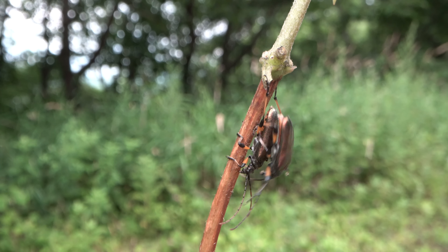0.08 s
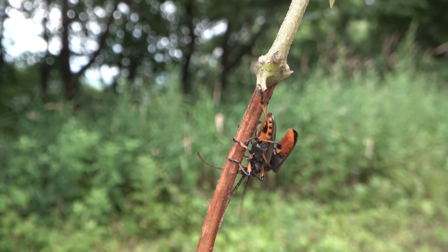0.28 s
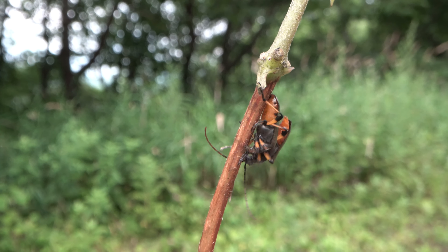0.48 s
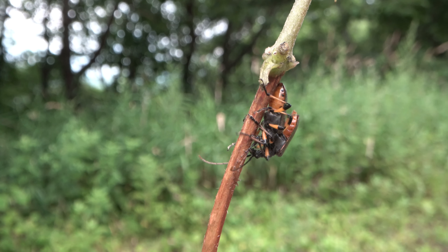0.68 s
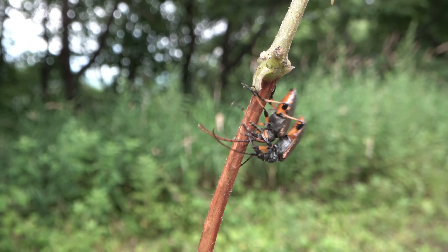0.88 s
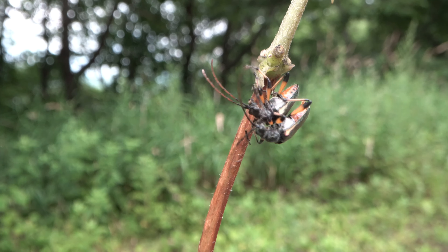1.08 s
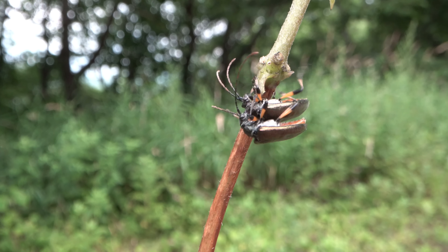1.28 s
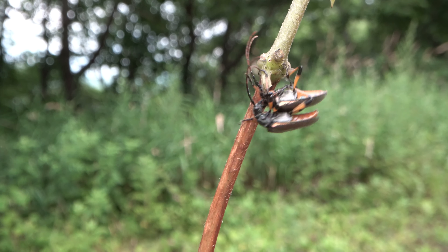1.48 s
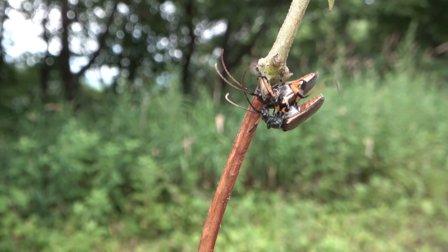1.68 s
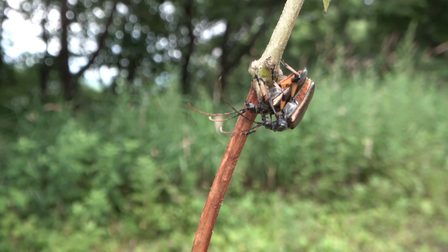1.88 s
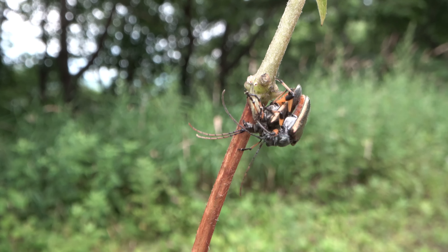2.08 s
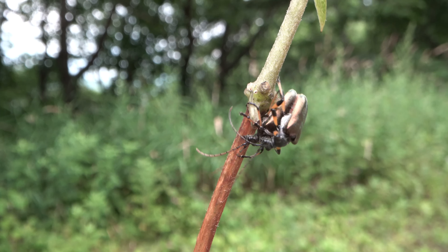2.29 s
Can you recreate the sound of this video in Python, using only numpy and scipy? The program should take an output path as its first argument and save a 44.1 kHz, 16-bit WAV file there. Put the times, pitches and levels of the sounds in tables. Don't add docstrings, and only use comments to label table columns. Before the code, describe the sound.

Two beetles wrestle on a dry stem against the microphone. Faint hiss and low rumble until 0.2 s, then dense crackling, knocks and gritty leg scrapes, with the loudest overloaded snaps around 0.8-0.9 s. After 1 s it thins to sparse ticks and dull foot thumps, with a small flurry near 1.45 s, a tiny rasping squeak at 1.8 s, a sharp tick at 1.93 s and a fainter rising squeak at 2.27 s.

```python
import sys
import numpy as np
from scipy import signal
from scipy.fft import rfft, irfft
from scipy.io import wavfile
from scipy.ndimage import uniform_filter1d

SR = 44100
rng = np.random.default_rng(int(sys.argv[2]) if len(sys.argv) > 2 else 0)


def gain_from_db(level_db):
    decades = np.asarray(level_db, float) / 20
    return 10 ** decades


def to_wav(s):
    ch = np.atleast_2d(s).T
    pcm = np.round(np.clip(ch, -1, 1) * 32767)
    wavfile.write(sys.argv[1], SR, pcm.astype(np.int16))


N = 103635
T = np.arange(N) / SR


def evened(x):
    return x / np.sqrt(np.mean(x ** 2) + 1e-20)


def wander(size, count=1):
    noise = rng.standard_normal((count, N))
    return evened(uniform_filter1d(uniform_filter1d(noise, size=size), size=size))


def per_group(low_db, bright_db, middle_db=0):
    return gain_from_db([[low_db], [middle_db], [bright_db]])


# time in seconds, peak level in dB, share of low thump in dB, share of bright click in dB.
EARLY_TICKS = [(0.1612, -28.5, -8.5, -19), (0.211, -20.5, -5.5, -9), (0.2275, -9, -7.5, -11.5),
               (0.2434, -9, -6, -20), (0.25, -16, -24, -2.5), (0.26, -7.5, -7, -10),
               (0.307, -13.5, -17, -29), (0.3208, -8, -5.5, -9.5), (0.3935, -11, -0.5, -8),
               (0.4007, -4.5, -9, -17), (0.4198, -17, -16, -6), (0.4237, -8, -14, -4.5),
               (0.4394, -10, -1, -12), (0.461, -6, -37, -4), (0.476, -7.5, -25, -7.5),
               (0.4883, -25, -4, -29), (0.5088, -1.5, -14, -31), (0.5235, -8.5, -7, 3),
               (0.6421, 0.5, -13.5, -17), (0.6716, -18, -1.5, -5), (0.6741, -15.5, -9, -9),
               (0.741, -13, -7.5, -15), (0.7476, -15.5, -29, -14), (0.7639, -4.5, -19, -15.5),
               (0.7985, 10, -22, -12.5), (0.8031, 0, -11, -13), (0.8077, -14, 3, -13),
               (0.8298, -12, -8, -15), (0.844, -9.5, -29, -13)]
LATE_TICKS = [(0.863, -22, -20, -22), (0.877, -7, -12, -8), (0.8861, 6, -11.5, -7), (0.905, -1.5, -9, -29),
              (0.974, -17, -15, -22), (1.032, -21, -24, -42), (1.1559, -23, 2, -7), (1.255, -27, -3.5, -9),
              (1.312, -20, -38, -14.5), (1.3333, -21, -5, -28), (1.389, -20, -24, -16),
              (1.3952, -19.5, -1, -27), (1.4494, -17, 2.5, -30), (1.461, -8, -4.5, -18),
              (1.4898, -26, -19, 6.5), (1.498, -22.5, -4, 0.5), (1.5386, -15.5, -6, -28),
              (1.669, -15, -11, -30), (1.7037, -15.5, -4, -8.5), (1.8614, -11.5, -10.5, -9.5),
              (1.9123, -18.5, -12, -6.5), (1.9348, 1, -26, -6), (1.9476, -9.5, -6, 0),
              (1.9565, -23, -12, -8), (1.992, -19, -31, -9.5), (2.0349, -19, -1, -11),
              (2.0637, -13, -2.5, -16), (2.0901, -20, -20, -11), (2.187, -21.5, -9, -10.5),
              (2.321, -11.5, -19.5, -16)]
SMALL_TICKS = [(0.2024, -26, -14, -10), (0.2463, -15, -32, -16), (0.2714, -20, -7, -10),
               (0.2774, -23, -9, -7), (0.2874, -22, -12, -18), (0.2984, -15.5, -3, -18),
               (0.3274, -22, 2, -14), (0.3481, -20.5, -19, -3), (0.4094, -20, -4, -12),
               (0.4144, -9.5, -4.5, -13), (0.4304, -9.5, -7, -20), (0.4534, -11, -17, -20),
               (0.4674, -8, -6, -15), (0.5264, -6.5, -22, -13), (0.5324, -22, -19, -3),
               (0.5434, -19, -5, -1), (0.5564, -16.5, -9, -8), (0.5604, -23, -1, -1), (0.5634, -20, -4, -2),
               (0.5801, -23, -19, -15), (0.5964, -14, -7.5, -14), (0.9104, -20, 1, -12),
               (0.9204, -20, -24, -7), (0.9304, -12.5, -10, -7), (0.9388, -14.5, -1.5, -2),
               (0.9464, -14.5, -11, 5.5), (0.9574, -17, -1, -9), (0.9614, -30, -23, -6),
               (0.9674, -14, -11.5, -21), (1.1034, -19, -11, -8), (1.1508, -26.5, -1, -10),
               (1.2017, -26.5, -21, -3.5), (1.2221, -22.5, -21, -18), (1.2974, -21, -10, -18),
               (1.4117, -27, -2, -2.5), (1.4704, -16, -17, -25), (1.4834, -11, -22, -13),
               (1.6107, -26, -11, -14), (1.8497, -25.5, -7, -7), (1.9769, -19, -23, -13),
               (2.0258, -18.5, -21, -17), (2.0764, -20, -6, -10)]
# time in seconds, peak level in dB.
FOOT_THUMPS = [(0.337, -18), (0.3514, -17.5), (0.467, -15), (0.65, -18), (0.9342, -20.5), (1.288, -27.5),
               (1.4379, -21), (1.4765, -22), (1.722, -24), (1.744, -23), (1.8209, -20.5), (1.8813, -29),
               (1.8934, -21), (2.0768, -23), (2.2304, -24), (2.243, -30)]


def ticks_and_thumps():
    rattle_s, rattle_db = 0.0026, -6.5
    scuff_s, scuff_db = 0.0009, -11
    bounces_per_s = 2200
    knocks = np.zeros((3, N))
    for start, db, low_db, bright_db in EARLY_TICKS + LATE_TICKS + SMALL_TICKS:
        knocks[:, round(start * SR)] += per_group(db + low_db, db + bright_db, db)[:, 0]
    feet = np.zeros(N)
    for start, db in FOOT_THUMPS:
        feet[round(start * SR)] -= gain_from_db(db)

    after = signal.lfilter([0, 1], [1, -np.exp(-1 / (rattle_s * SR))], knocks)
    backwards = knocks[:, ::-1]
    before = signal.lfilter([0, 1], [1, -np.exp(-1 / (scuff_s * SR))], backwards)[:, ::-1]
    bounces = rng.uniform(-1.15, 1, N) * (rng.random(N) < bounces_per_s / SR)
    knocks += (gain_from_db(rattle_db) * after + gain_from_db(scuff_db) * before) * bounces
    knocks[0] += 2 * uniform_filter1d(uniform_filter1d(feet, size=13), size=13)
    return knocks


# start in seconds, length in seconds, level in dB,
# share of low thump in dB, share of bright scrape in dB.
LEG_DRAGS = [(0.193, 0.051, -35.5, 1, -10.5), (0.239, 0.041, -29.5, 6, -18), (0.29, 0.071, -29.5, 0, -8.5),
             (0.388, 0.069, -22, 1, -11.5), (0.447, 0.044, -19.5, -3.5, -10.5),
             (0.494, 0.11, -28.5, -1, -8), (0.609, 0.014, -29.5, -2, -12), (0.622, 0.02, -20.5, -2.5, -13),
             (0.665, 0.021, -30.5, -1, -14), (0.7924, 0.014, -12, -3, -9), (0.815, 0.045, -27, -7, -13),
             (0.882, 0.0047, -13.5, -5.5, -13), (0.896, 0.058, -20, -6.5, -13),
             (0.929, 0.019, -17.5, -16, 2.5), (0.955, 0.0088, -14, -26, -5),
             (1.018, 0.033, -36, -17, -11.5), (1.088, 0.029, -33.5, -5.5, -2),
             (1.208, 0.02, -37, 0.5, -2.5), (1.285, 0.058, -37, -20, -9.5), (1.366, 0.069, -48, 14, -6),
             (1.454, 0.045, -21.5, 0.5, -13.5), (1.519, 0.035, -27.5, -9.5, -12),
             (1.665, 0.021, -31, 2, -18), (1.847, 0.0082, -36.5, 0, 1), (2.022, 0.023, -29.5, 2.5, -15),
             (2.042, 0.086, -37, 4, -13.5)]
# time in seconds, level in dB.
FIDGETING = [(0, -51.5), (.12, -49), (.19, -45), (.6, -42.5), (.75, -33.5), (1.0, -38), (1.25, -43),
             (1.44, -41), (1.62, -44), (1.72, -37.5), (1.95, -38), (2.16, -47), (2.23, -42), (2.35, -39.5)]


def leg_effort():
    rise_s, tail_s, sag_db = 0.00044, 0.0086, -3.5
    swell = 0.31
    s, db = np.transpose(FIDGETING)
    effort = gain_from_db(np.interp(T, s, db)) * per_group(0, -16, -6.5)
    for start, length, db, low_db, bright_db in LEG_DRAGS:
        since = T - start
        press = np.clip(since / (rise_s + swell * length), 0, 1)
        let_go = np.exp(-np.maximum(since - length, 0) / tail_s)
        sag = gain_from_db(sag_db * np.clip(since / length, 0, 1))
        drag = press * let_go * sag * per_group(db + low_db, db + bright_db, db)
        effort = np.hypot(effort, drag)
    return effort


def slips(per_s, spread_db):
    size = gain_from_db(spread_db * np.minimum(rng.exponential(1, N), 4)) * rng.choice([-1., 1.], N)
    return evened(size * (rng.random(N) < per_s / SR))


def leg_rub(effort):
    fine = slips(5000, spread_db=3)
    clumps = evened(gain_from_db(1.5 * wander(size=90)))
    shuffles = slips(900, spread_db=2)
    return effort * clumps * np.array([shuffles + 0.64 * fine, fine, fine])


# time in seconds, teeth per second, level in dB.
NECK_SQUEAKS = [
    [(1.764, 1060, -44), (1.769, 1040, -35), (1.778, 900, -32), (1.786, 1020, -32), (1.803, 1010, -32),
     (1.812, 1150, -32), (1.819, 1200, -44)],
    [(2.256, 800, -50), (2.264, 870, -41), (2.272, 920, -43), (2.279, 1040, -42), (2.281, 1160, -38),
     (2.305, 1290, -42), (2.316, 1050, -48)],
]


def squeaks():
    low_dbs, bright_dbs = (-9, -12), (-5, -14)
    jitters = (0.049, 0.024)
    tilts = (-0.14, 0.7)
    out = np.zeros((3, N))
    for rows, low_db, bright_db, jitter, tilt in zip(NECK_SQUEAKS, low_dbs, bright_dbs, jitters, tilts):
        s, teeth_per_s, db = np.transpose(rows)
        speed = np.interp(T, s, teeth_per_s) * (1 + jitter * wander(size=30)[0])
        turns = np.cumsum(speed) / SR
        teeth = np.zeros(N)
        for k in range(1, 11):
            teeth += min(k, 4.5) ** tilt * np.cos(2 * np.pi * k * turns)
        teeth = evened(teeth) * gain_from_db(1.7 * wander(size=20)[0])
        level = gain_from_db(np.interp(T, s, db, -150, -150))
        out += teeth * level * per_group(low_db, bright_db)
    return out


def ring(modes, contact_s, detune, taps, rub, squeak):
    t = np.arange(3000) / SR
    hz, db, t60 = np.transpose(modes)[:, :, None]
    signs = (-1.) ** np.arange(len(modes))[:, None]
    soft_start = (1 - np.exp(-t / contact_s)) ** 2
    decay = gain_from_db(db - 60 * t / t60) * soft_start * signs
    whole = (decay * np.sin(2 * np.pi * hz * t)).sum(0)
    peak, energy = abs(whole).max(), np.linalg.norm(whole)

    balance = gain_from_db(3 * np.clip(wander(size=70, count=len(modes)), -2, 2) - 5.0)
    dull = gain_from_db(-1.2 * np.maximum(hz - 8500, 0) / 1000)
    drive = taps / peak * balance ** 0.63 + rub / energy * balance * dull

    grip = np.clip(wander(size=120, count=len(modes)), -1, 1)
    out = signal.oaconvolve(squeak, whole / energy)[:N]
    for step in (-1, 0, 1):
        share = np.sqrt(np.clip(1 - abs(grip - step), 0, 1))
        tuned = decay * np.sin(2 * np.pi * hz * (1 + detune * step) * t)
        out += signal.oaconvolve(drive * share, tuned, axes=1)[:, :N].sum(0)
    return out


# pitch in Hz, level in dB, time to die away by 60 dB in seconds.
LOW_MODES = [(98, -22.5, 0.13), (255.7, -2, 0.032), (369, 2.5, 0.012), (653, 1, 0.015),
             (1098, -7.5, 0.0094), (1415, -7, 0.016), (1740, -1.5, 0.0096)]
MIDDLE_MODES = [(2052, -6, 0.0051), (2633, -11.5, 0.0089), (3242, 1.5, 0.0075), (3733, -6.5, 0.005),
                (4480, -7, 0.0052), (5090, -11.5, 0.0036), (5940, -18, 0.0074)]
BRIGHT_MODES = [(7603, 2, 0.0054), (9070, -1.5, 0.0017), (11070, 0.5, 0.0016), (13300, -16, 0.00062),
                (14000, 0.5, 0.0014)]


def stem(rub, taps, squeak):
    low = ring(LOW_MODES, 0.0003, 0.05, taps[0], rub[0], squeak[0])
    middle = ring(MIDDLE_MODES, 0.00042, 0.035, taps[1], rub[1], squeak[1])
    bright = ring(BRIGHT_MODES, 0.00026, 0.012, taps[2], rub[2], squeak[2])
    return low + middle + bright


def sway(push):
    band = signal.butter(3, (42, 130), "band", fs=SR, output="sos")
    rumble = evened(signal.sosfilt(band, rng.standard_normal(N)))
    return gain_from_db(-32) * rumble * uniform_filter1d(push, size=1500) ** 0.66


# pitch in Hz, level in dB per Hz.
HISS_COLOUR = [(25, -24), (90, -5), (200, -15), (800, -2), (1150, -11), (2100, -19.5), (15700, -23.5)]


def hiss():
    f, db = np.transpose(HISS_COLOUR)
    hz = np.fft.rfftfreq(N, 1 / SR)
    colour = gain_from_db(np.interp(np.log(hz + 1), np.log(f), db))
    return gain_from_db(-53.5) * evened(irfft(rfft(rng.standard_normal(N)) * colour, N))


def scene():
    effort = leg_effort()
    ringing = stem(leg_rub(effort), ticks_and_thumps(), squeaks())
    ringing = signal.lfilter(*signal.butter(2, 60, "high", fs=SR), ringing)
    near = ringing + hiss() + sway(effort[0])
    own_hiss = gain_from_db(-73) * rng.standard_normal((2, N))
    difference = gain_from_db(-52) * near * wander(size=150) * [[1], [-1]]
    left_db = 1.35
    return near * gain_from_db([[left_db / 2], [-left_db / 2]]) + own_hiss + difference


def roll_off(x):
    return signal.sosfilt(signal.butter(12, 15850, fs=SR, output="sos"), x)


def record(dry):
    lowpass = signal.firwin(1023, 15850, window=("kaiser", 9), fs=SR)
    soft = signal.oaconvolve(dry, lowpass[None], "same")
    return roll_off(np.clip(soft, -1, 1))


dry = scene()
out = record(dry)
to_wav(out)
```